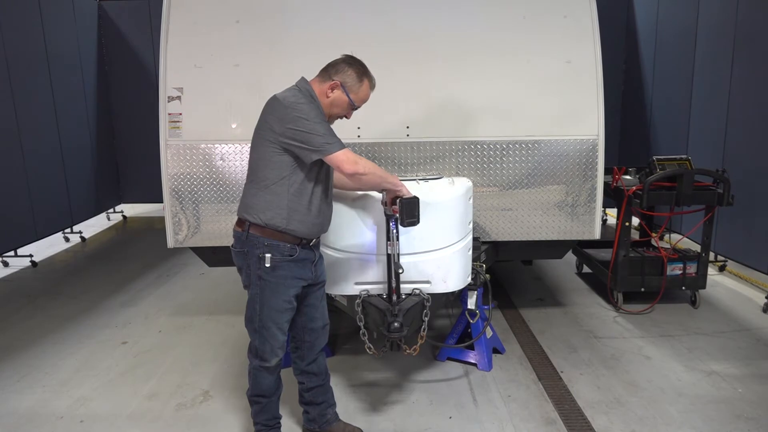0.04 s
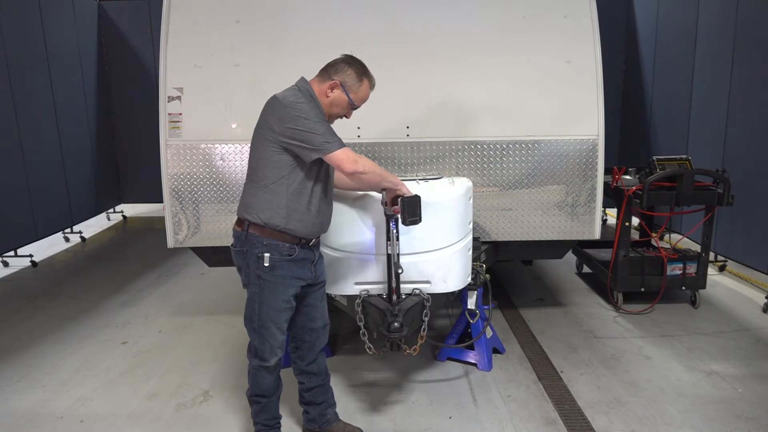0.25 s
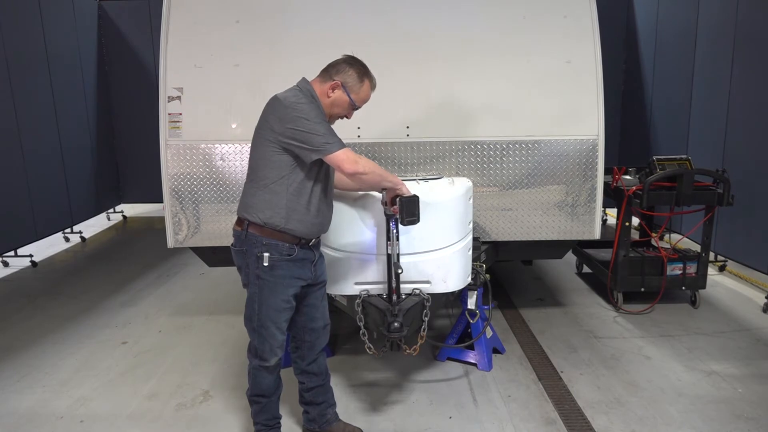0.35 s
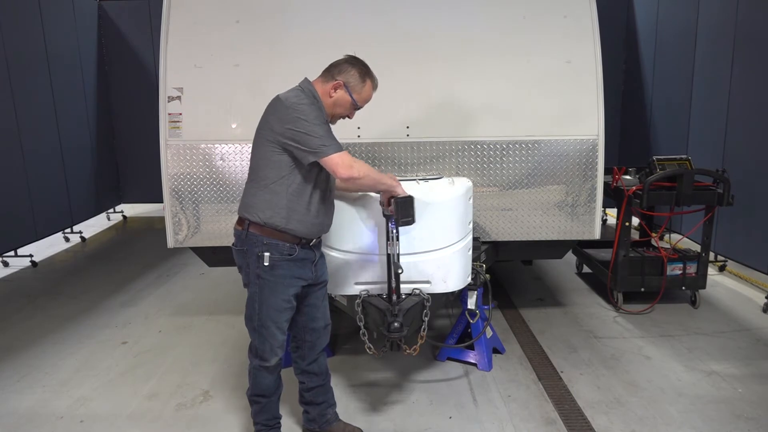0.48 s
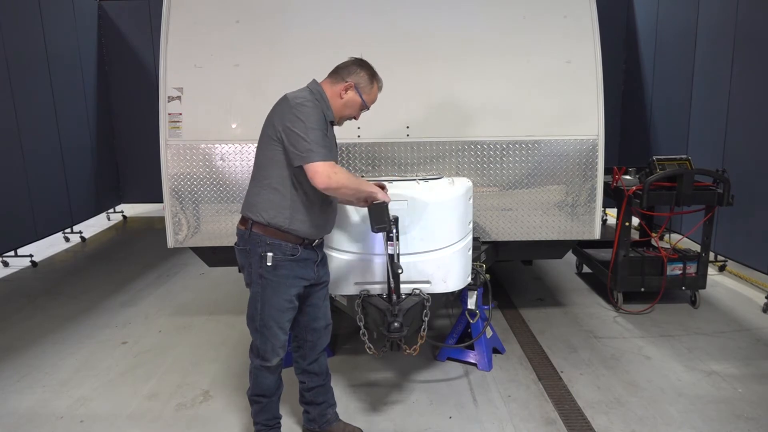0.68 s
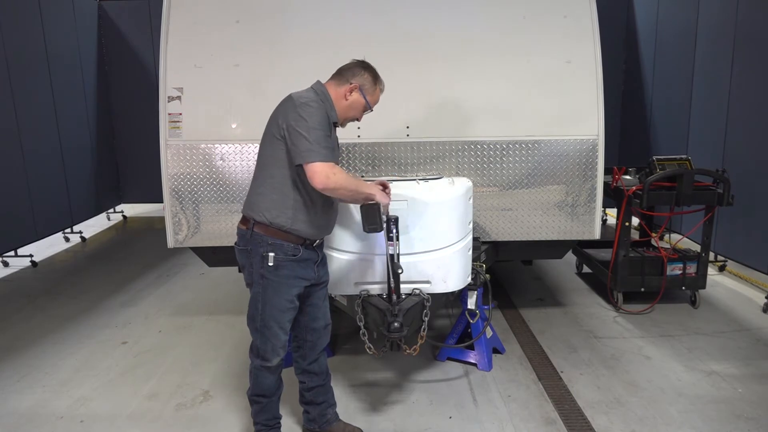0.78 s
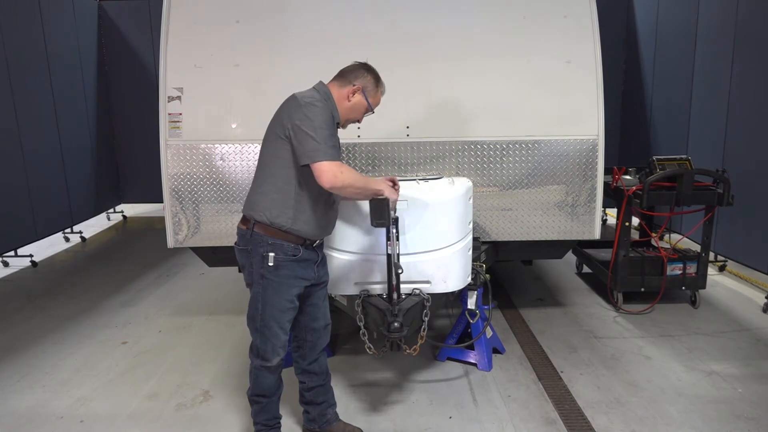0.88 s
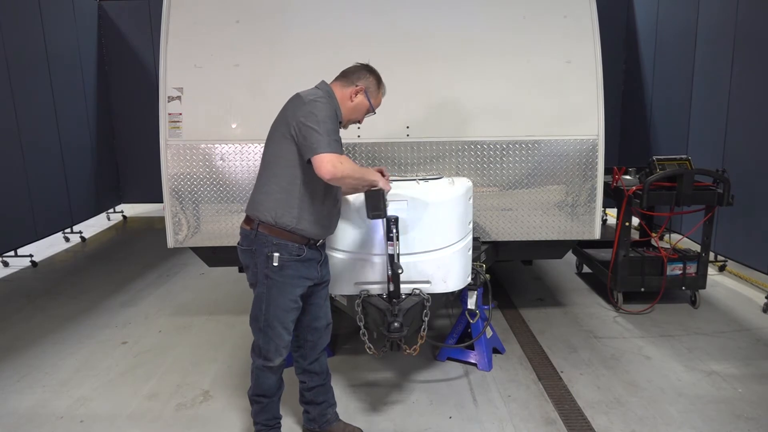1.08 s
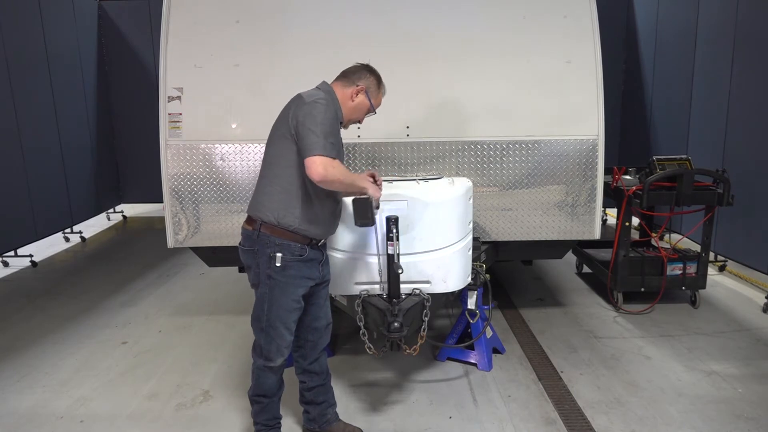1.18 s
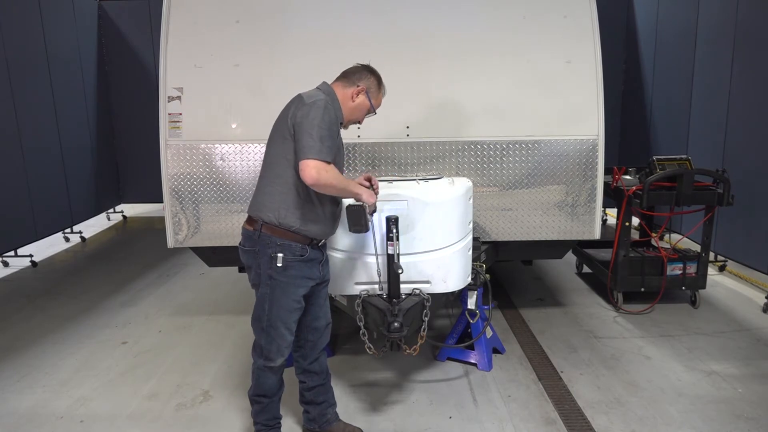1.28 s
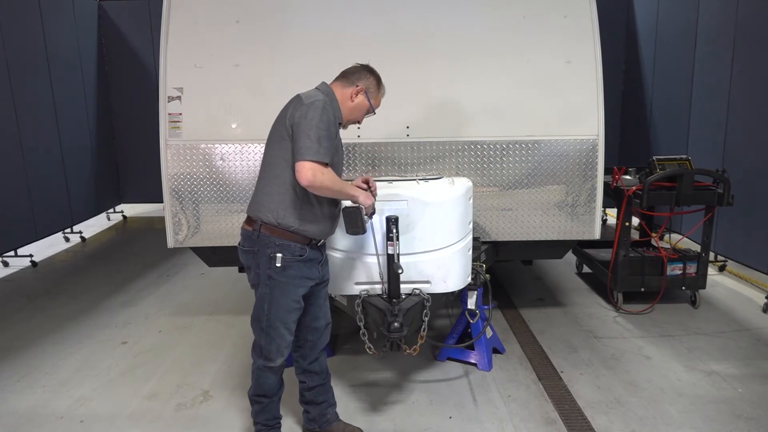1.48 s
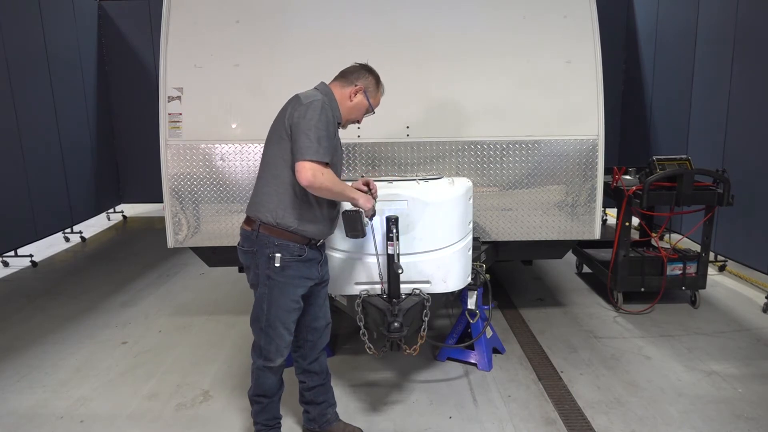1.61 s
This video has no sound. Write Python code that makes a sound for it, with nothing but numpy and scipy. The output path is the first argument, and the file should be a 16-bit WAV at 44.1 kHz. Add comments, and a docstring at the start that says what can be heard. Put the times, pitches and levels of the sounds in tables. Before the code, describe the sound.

A metal part clatters up a trailer jack's steel tube from about 0.2 to 0.35 seconds, with quick knocks and a rough scrape. The tube rings and the sound fades through a large workshop. Around 1 second come lighter taps, clicks, tiny high squeaks and a clink. Two faint taps follow at 1.5 seconds. Soft handling rustle and a low ventilation hum lie underneath.

```python
"""A motor head is tugged off the steel tube of a trailer jack in a large, hard workshop.
Ventilation and electrical hum run throughout, under a faint handling rustle. From 0.17 s the head knocks
and chatters up the tube and its shaft scrapes; at 0.23 s it lets go, ringing the tube, the trailer frame
and the room. Around 1 s it is lifted away: the shaft taps, loose parts click, sliding metal squeaks
and a pin clinks. Two faint shaft taps follow at 1.5 s."""
import sys
import numpy as np
from scipy import signal
from scipy.fft import rfft, irfft
from scipy.io import wavfile
from scipy.ndimage import uniform_filter1d

SR = 44100
rng = np.random.default_rng(int(sys.argv[2]) if len(sys.argv) > 2 else 0)


def dump_mix(stems):
    """Bounce the given channels to the path in sys.argv[1] as a 16-bit WAV at rate SR."""
    frames = np.atleast_2d(stems).T  # one column per channel
    limited = np.clip(frames, -1, 1)  # hard clip at full scale
    pcm = np.round(limited * 32767).astype(np.int16)
    wavfile.write(sys.argv[1], SR, pcm)


N = 72765
T = np.arange(N) / SR


def amp(db):
    """Decibels to gain."""
    return 10 ** (np.asarray(db) / 20)


def unit(x):
    """Scale to rms 1."""
    return x / np.sqrt(np.mean(x ** 2))


def on_hz(hz, points):
    """Read (frequency [Hz], value) points on a log-frequency axis."""
    freqs, values = np.array(points).T
    return np.interp(np.log(np.maximum(hz, 1)), np.log(freqs), values)


def swell(points):
    """Gain curve from (time [s], level [dB]) points."""
    return amp(np.interp(T, *np.array(points).T))


def fade(t60_s):
    """Exponential decay."""
    return np.exp(-np.log(1000) * T / max(t60_s, 1e-3))


def onset(rise_s):
    """Exponential rise to 1."""
    return 1 - np.exp(-T / rise_s)


def through(x, response):
    """Convolve with an impulse response."""
    return signal.fftconvolve(x, response)[:N]


def colour(x, points):
    """Minimum-phase filter from (frequency [Hz], gain [dB]) points."""
    hz = np.arange(N + 1) * SR / (2 * N)
    cepstrum = irfft(np.log(amp(on_hz(hz, points))))
    cepstrum[1:N] *= 2
    cepstrum[N + 1:] = 0
    return irfft(rfft(x, 2 * N) * np.exp(rfft(cepstrum)))[:N]


def noise(points):
    """Coloured noise, rms 1."""
    return unit(colour(rng.standard_normal(N), points))


def add(out, x, start_s):
    """Mix x in from a start time."""
    i = int(max(start_s, 0) * SR)
    out[i:i + len(x)] += x[:N - i]


def ring(modes, tilt_db_oct=0):
    """Decaying sines, tilted about the first mode."""
    return sum(amp(db + tilt_db_oct * np.log2(hz / modes[0][0])) * fade(t60) * np.sin(2 * np.pi * hz * T)
               for hz, db, t60 in modes)


def strikes(rows, modes, contact_s=.00025):
    """Light strikes, each setting the same modes going over the contact time."""
    out = np.zeros(N)
    for start_s, db, tilt in rows:
        add(out, amp(db) * ring(modes, tilt) * onset(contact_s), start_s)
    return out


def contacts(rows, pivot_hz, after_db, after_t60_s, tick_db=-10.5):
    """Each contact is a tick, a crack of dense resonances and a weaker after-ring."""
    out = np.zeros(N)
    for start_s, db, tilt, t60_s in rows:
        decay = unit(fade(t60_s)) + amp(after_db) * unit(fade(after_t60_s))
        crack = rng.standard_normal(N) * decay / np.sqrt(N)
        crack[0] += amp(tick_db)
        slope = [(pivot_hz * 2. ** octave, db + tilt * octave) for octave in (-2, 2)]
        add(out, colour(crack, slope), start_s)
    return out


# (frequency [Hz], gain [dB])
VENT_COLOUR = [(18, -60.5), (30, -29), (115, -6.5), (153, -13), (415, -9.5), (461, -20.5), (1130, -8),
               (1320, -10.5), (3980, -37), (16000, -28.5)]
# (frequency [Hz], level [dB])
HUM_TONES = [(120, -77.5), (1787, -75), (4100, -81)]
def hall(vent_db=-65.5):
    """Ventilation noise and faint electrical tones."""
    hum = sum(amp(db) * np.sqrt(2) * np.sin(2 * np.pi * hz * T) for hz, db in HUM_TONES)
    return amp(vent_db) * noise(VENT_COLOUR) + hum


# (time [s], level [dB])
RUSTLE_LEVEL = [(0, -47), (.06, -49), (.17, -47), (.4, -55), (.9, -56), (1.02, -50), (1.15, -57),
                (1.23, -53), (1.33, -58.5), (1.48, -61.5), (1.65, -70.5)]
HISS_LEVEL = [(0, -85), (.09, -83), (.125, -71), (.17, -74), (.6, -71), (.71, -65), (.82, -66), (.9, -71.5),
              (1.12, -67), (1.24, -63), (1.35, -68.5), (1.45, -85)]
# (frequency [Hz], gain [dB])
RUSTLE_COLOUR = [(60, -15), (250, -1.5), (650, -1.5), (870, 7), (1050, -1), (1500, -5), (1900, -6.5),
                 (2350, -3), (2900, -5.5), (4400, -12), (5500, -15), (9000, -26.5), (16000, -29.5)]
HISS_COLOUR = [(3000, -39.5), (7000, -5.5), (11000, -4.5), (15000, -9.5)]
def handling(rough_db=2):
    """Uneven rubbing of hands, sleeve and shaft, with a thin sliding hiss on top."""
    grip = amp(rough_db * unit(uniform_filter1d(rng.standard_normal(N), size=500)))
    rustle = noise(RUSTLE_COLOUR) * swell(RUSTLE_LEVEL)
    hiss = noise(HISS_COLOUR) * swell(HISS_LEVEL)
    return grip * (rustle + hiss)


# (frequency [Hz], t60 [s])
ROOM_DECAY = [(100, 1.2), (400, 0.17), (900, 1.11), (2200, 1.57), (4000, 1.344), (7000, 1.02),
              (12000, 0.57), (16000, .5)]
# (frequency [Hz], gain [dB])
ROOM_COLOUR = [(100, -2), (500, -6), (900, 0), (1300, -8.5), (1700, -1), (2250, -1), (2750, -4), (3500, 1),
               (4200, -5.5), (6000, -4.5), (12000, -2.5)]
def room_response(gain_db=-45.5, build_s=.017):
    """A diffuse tail builds up, then each third octave decays at its own rate."""
    spectrum, hz = rfft(rng.standard_normal(N)), np.fft.rfftfreq(N, 1 / SR)
    third_octave = np.round(3 * np.log2(np.maximum(hz, 100)))
    tail = np.zeros(N)
    for index in np.unique(third_octave):
        band = third_octave == index
        tail += irfft(spectrum * band, N) * fade(on_hz(hz[band].mean(), ROOM_DECAY))
    return amp(gain_db) * colour(tail, ROOM_COLOUR) * onset(build_s)


# (time [s], length [s], frequency [Hz], level [dB])
SQUEAKS = [(0.964, .03, 15200, -63), (0.989, 0.012, 12800, -54), (0.99, .016, 11700, -58),
           (1.016, 0.013, 12200, -55.5), (1.03, 0.028, 12700, -58.5)]
def squeaks(width_hz=290):
    """Brief, rough whistles of metal sliding on metal."""
    out = np.zeros(N)
    for start_s, length_s, hz, db in SQUEAKS:
        resonance = np.exp(-np.pi * width_hz * T) * np.sin(2 * np.pi * hz * T)
        whistle = unit(through(rng.standard_normal(N), resonance))
        arch = np.sin(np.pi * np.minimum(T / length_s, 1)).clip(0)
        add(out, amp(db) * whistle * np.sqrt(arch), start_s)
    return out


# (time [s], level [dB], tilt [dB/oct], t60 [s])
PART_CLICKS = [(.9577, 0, 5, 0.03), (0.9637, -4, -4.5, 0.1), (.9775, -4, -2.5, 0.079),
               (0.995, -13.5, 7.5, 0.017), (1.0115, -8, -3, 0.033), (1.023, -11, 0.5, 0.054),
               (1.0385, -6.5, -3.5, 0.017), (1.048, -12, -4, 0.083), (1.0895, -5, 1, 0.05)]
# (frequency [Hz], gain [dB])
PART_COLOUR = [(40, -33), (190, -16.5), (300, -31), (650, -12), (900, 5.5), (1300, -3), (1850, 0.5),
               (3300, -3.5), (4200, -2.5), (6000, -9), (7200, -21.5), (11000, -27), (16000, -36)]
# (time [s], level [dB], tilt [dB/oct])
SHAFT_TAPS = [(.9362, -38.5, 1.5), (.9385, -31, -1), (1.497, -56.5, -13), (1.51, -44.5, -21)]
PIN_CLINKS = [(1.0893, -38.5, -0.45), (1.0943, -45.5, -2)]
# (frequency [Hz], level [dB], t60 [s])
PART_MODES = [(187.8, -11.5, 0.33), (869, 1, 0.27), (980, -8, 0.16), (1770, 0.5, 0.23), (1924, -11, .12),
              (2740, -2, .15), (3960, -9, 0.028), (4195, 8.5, 0.066), (5700, -5, .08)]
SHAFT_MODES = [(1180, -1.5, 0.072), (1197, -14, 0.041), (2330, -11, .03), (3620, 2, .013),
               (11670, -2.5, 0.0057)]
PIN_MODES = [(1460, -18, 0.088), (1910, -4, 0.072), (2815, -1.5, .06), (3020, -2.5, .04), (3880, 0, 0.05),
             (4810, -7, .11), (5017, 2, 0.058), (5480, 6, 0.025), (5950, -12, .02)]
def loose_parts(click_db=-3, ring_db=-41.5):
    """Small steel clicks, hollow shaft taps and bright pin clinks as the head is lifted clear."""
    clicks = contacts(PART_CLICKS, pivot_hz=2530, after_db=-6.5, after_t60_s=.28)
    out = colour(amp(click_db) * clicks, PART_COLOUR)
    add(out, amp(ring_db) * ring(PART_MODES), start_s=PART_CLICKS[0][0])
    return out + strikes(SHAFT_TAPS, SHAFT_MODES) + strikes(PIN_CLINKS, PIN_MODES)


# (time [s], frequency [Hz], level [dB])
SCRAPE_GLIDE = [(.197, 1103, -43.5), (.218, 1154, -27), (.24, 1397, -26.5), (0.259, 1548, -24),
                (.276, 1393, -23), (.29, 1290, -23.5), (.31, 1220, -42.5)]
def scrape(roughness=.82, flutter_hz=129):
    """The sliding shaft sings roughly; its pitch rises and falls with the speed of the pull."""
    times, hz, db = np.array(SCRAPE_GLIDE).T
    flutter = [roughness * noise([(flutter_hz, 0), (flutter_hz * 10, -50)]) for _ in range(2)]
    phase = 2 * np.pi * np.cumsum(np.interp(T, times, hz)) / SR
    tone = (1 + flutter[0]) * np.sin(phase) + flutter[1] * np.cos(phase)
    sliding = (T > times[0]) & (T < times[-1])
    return unit(tone) * amp(np.interp(T, times, db)) * sliding


# (time [s], level [dB])
CHATTER_FORCE = [(.165, -38), (.19, -26), (.2, -9.5), (.21, -0.5), (.235, -1), (.28, -1.5), (.31, -1.5),
                 (.33, -8), (.36, -20.5)]
def chatter(ticks_per_s=1500, spread_db=2, t60_s=.02, grit_from_s=.232, grit_hz=8930, grit_db=1.5):
    """Force of tiny contacts between the knocks; the edges scrape brighter once the head moves."""
    ticks = (rng.random(N) < ticks_per_s / SR) * amp(spread_db * rng.standard_normal(N))
    tick_energy = abs(through(ticks ** 2, fade(t60_s) ** 2))
    grain = unit(np.sqrt(tick_energy))
    grit = colour(rng.standard_normal(N), [(grit_hz / 4, -20), (grit_hz, 0)]) * (T > grit_from_s)
    friction = rng.standard_normal(N) + amp(grit_db) * grit
    return grain * friction * swell(CHATTER_FORCE) * (T < CHATTER_FORCE[-1][0])


# (time [s], level [dB], tilt [dB/oct], t60 [s])
HEAD_KNOCKS = [(.1745, -33.5, -1, 0.013), (.185, -37.5, -0.5, 0.011), (.2057, -1.5, 0, 0.0073),
               (.2105, -14, 1.5, 0.026), (.2255, -9.5, -5.5, 0.015), (.231, -4.5, -1.5, .015),
               (.2338, -8, 3, .02), (.2364, -1, -3, 0.011), (.2442, -2, 1.5, 0.023),
               (.2603, -6.5, -5, 0.016), (.266, -2, 1, 0.016), (.271, -10, 1, 0.013),
               (.2875, -5.5, 4, .018), (.2895, -4, 4.5, 0.016), (.3075, -11.5, 1, 0.069),
               (.3135, -12.5, 0.5, 0.031), (.3295, -23.5, -2.5, 0.016)]
# (frequency [Hz], gain [dB])
STEEL_COLOUR = [(30, -38.5), (120, -30), (230, -18), (400, -13.5), (700, -1), (1350, 0), (1750, -2.5),
                (2300, 2.5), (3300, -3), (4800, -4), (6800, -11.5), (9800, -17), (12000, -16.5),
                (16000, -20.5)]
FRAME_COLOUR = [(30, -22), (62, -21), (85, -6), (135, -12.5), (210, 2), (330, -0.5), (700, -7.5),
                (3000, -59.5)]
# (frequency [Hz], level [dB], t60 [s])
TUBE_MODES = [(243.7, -8.5, 0.63), (853, -0.5, 0.43), (1310, 6, .22), (1362, 3.5, .22), (1385, 2.5, 0.11),
              (1574, 4, .35), (1640, -15.5, 1.4), (1674, -9.5, 0.85), (2115, -3.5, 0.68),
              (2146, -9.5, 0.46), (2206, -12.5, 1.6), (2323, -15, 1.3), (2266, -8, 0.58), (2473, 0.5, 0.28),
              (2760, -3, .22), (2764, 1.5, 0.23), (3530, -8.5, 0.61)]
def head_clatter(chatter_db=-11, knock_db=16.5, tube_db=-29, frame_db=-16.5, release_s=.229):
    """The head knocks and chatters up the tube; as it lets go the tube rings and the frame booms."""
    force = amp(chatter_db) * chatter()
    force += amp(knock_db) * contacts(HEAD_KNOCKS, pivot_hz=2500, after_db=-6, after_t60_s=.19)
    out = colour(force, STEEL_COLOUR)
    tube = amp(tube_db) * ring(TUBE_MODES) * onset(rise_s=.012)
    frame = amp(frame_db) * colour(rng.standard_normal(N) * fade(t60_s=.69), FRAME_COLOUR)
    add(out, tube + frame, release_s)
    return out


def scene():
    """The metal sounds and their reverberation, over rustle and hum."""
    room = room_response()
    metal = head_clatter() + scrape() + loose_parts() + squeaks()
    return (metal + through(metal, room) + handling() + hall())[None]


def record(dry):
    """Soft-clip the peaks, then low-pass at 15.8 kHz."""
    lowpass = signal.ellip(10, .2, 80, 15800, fs=SR, output="sos")
    return signal.sosfilt(lowpass, np.tanh(dry))


dry = scene()
out = record(dry)
dump_mix(out)
```